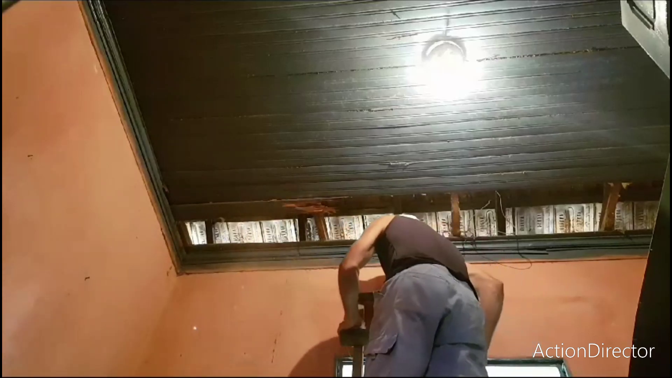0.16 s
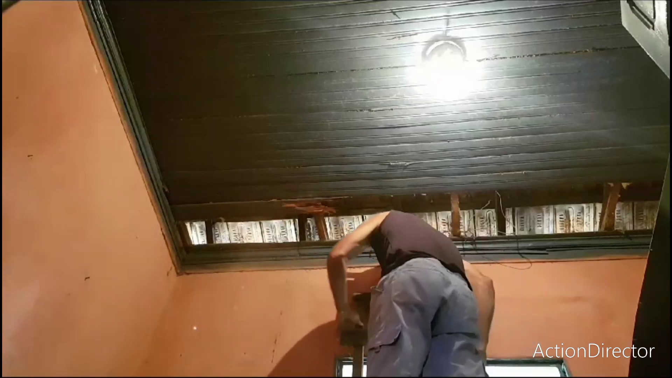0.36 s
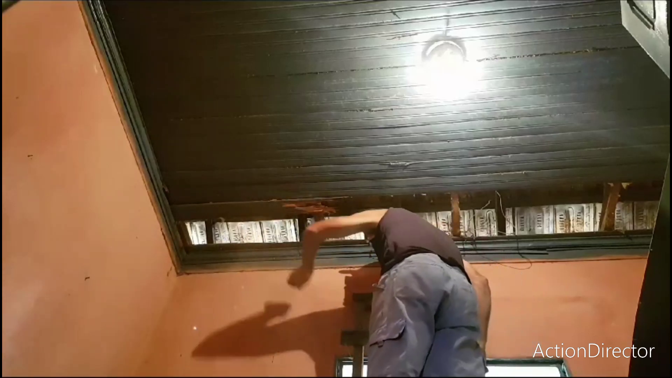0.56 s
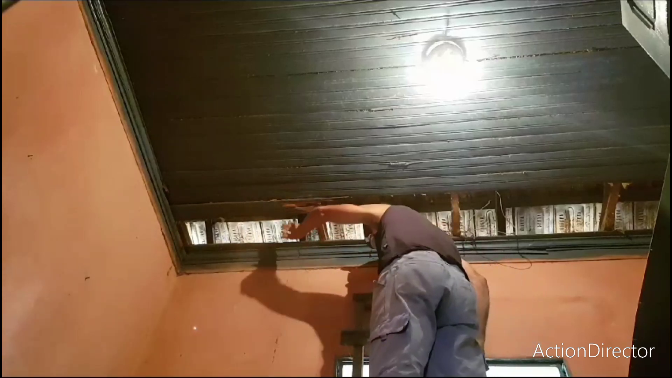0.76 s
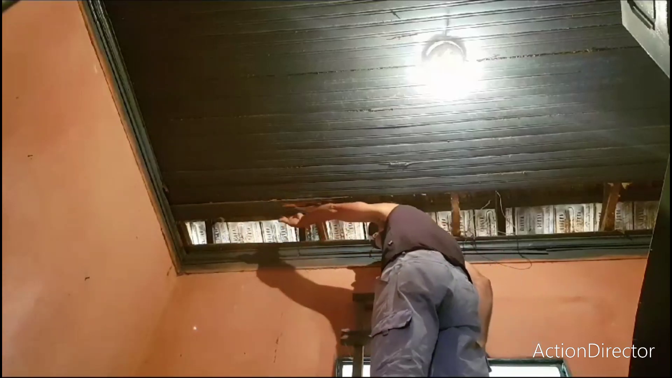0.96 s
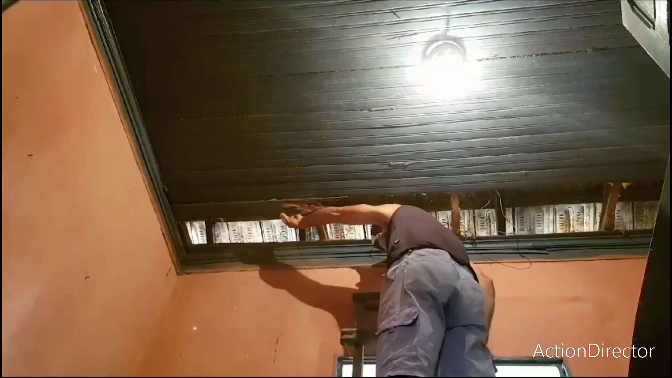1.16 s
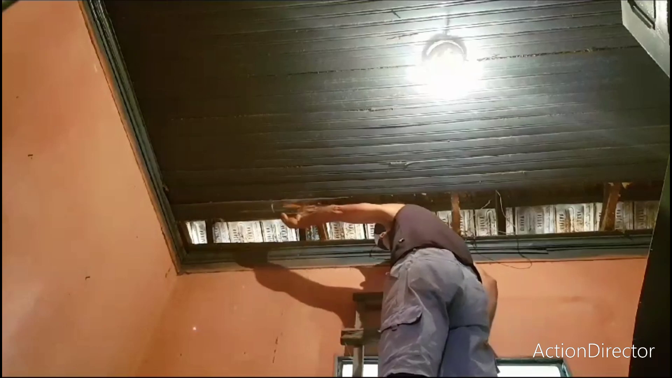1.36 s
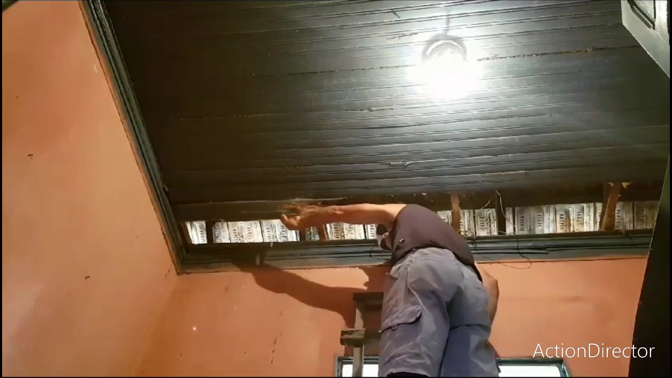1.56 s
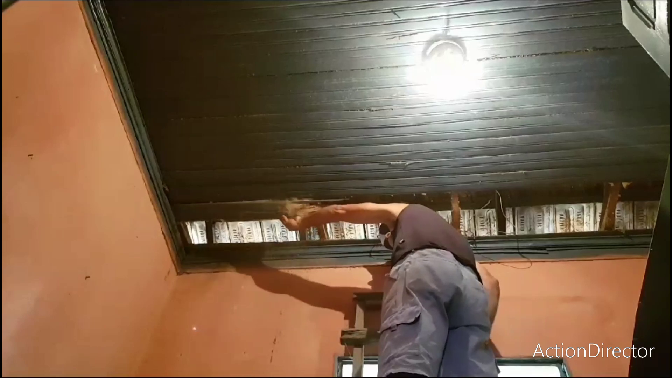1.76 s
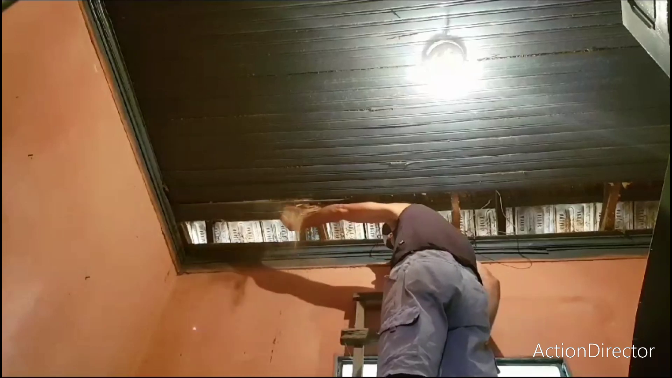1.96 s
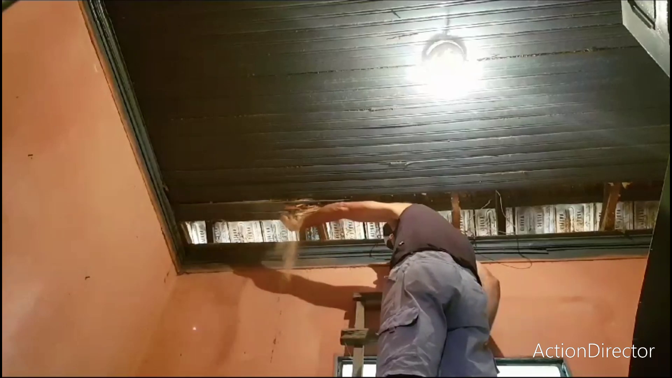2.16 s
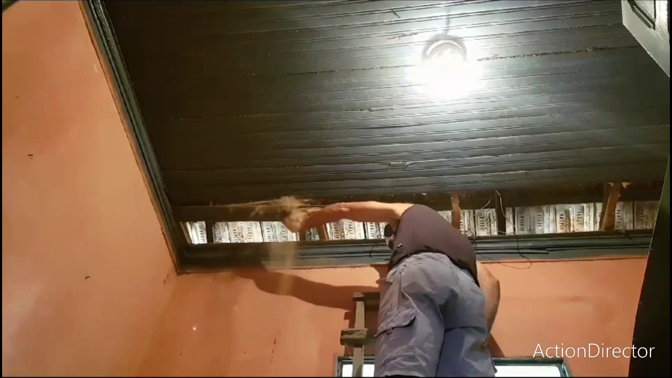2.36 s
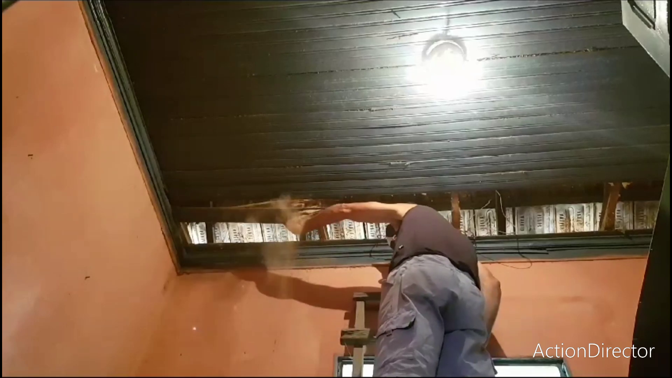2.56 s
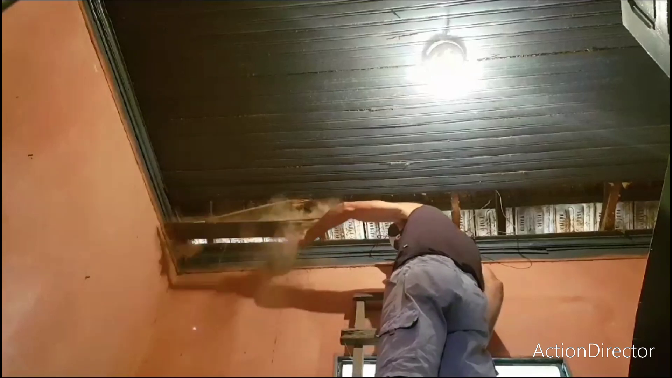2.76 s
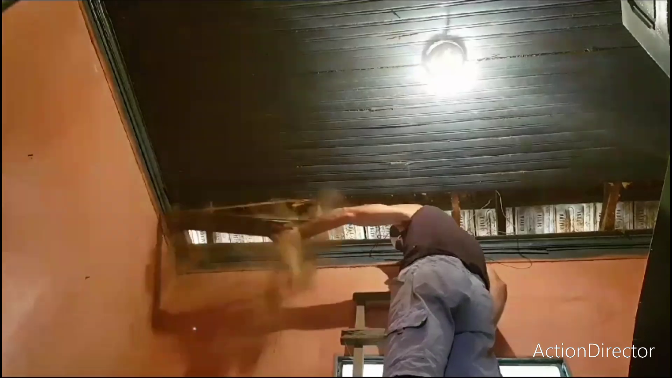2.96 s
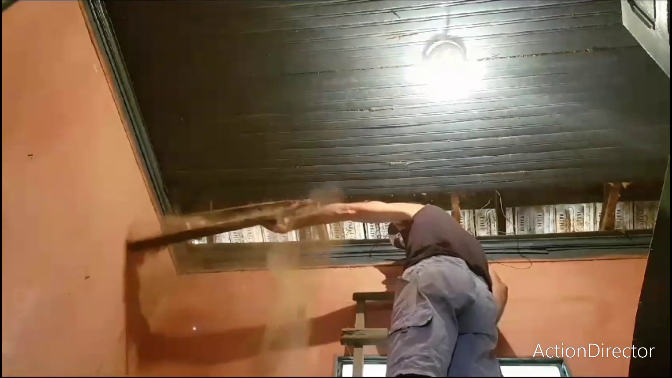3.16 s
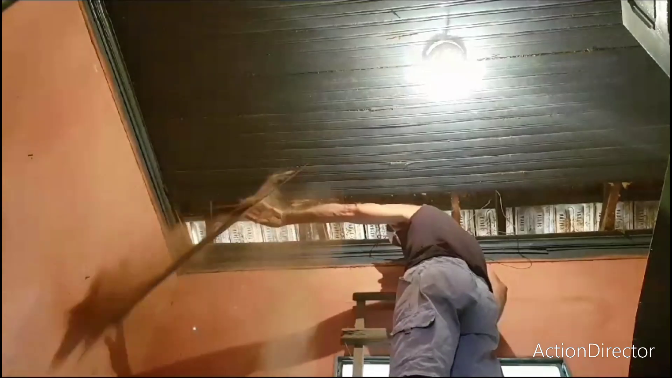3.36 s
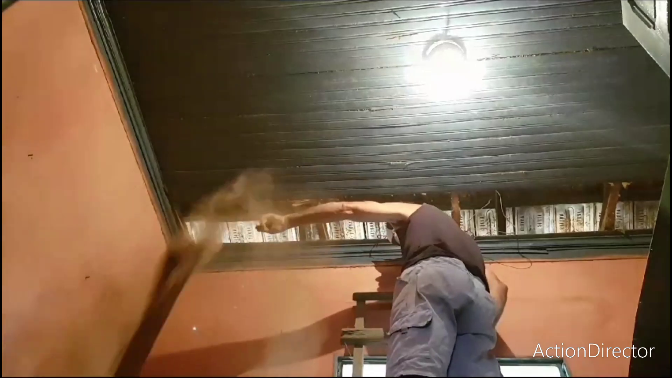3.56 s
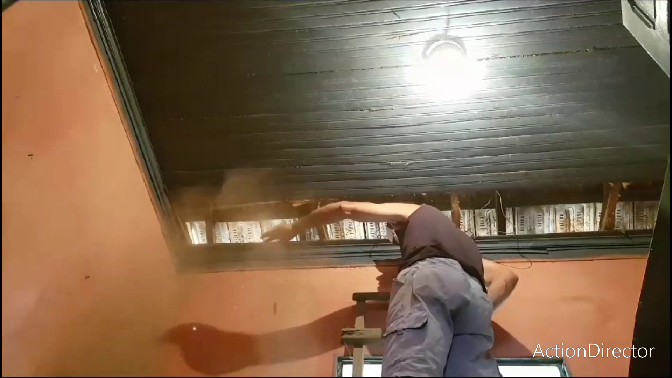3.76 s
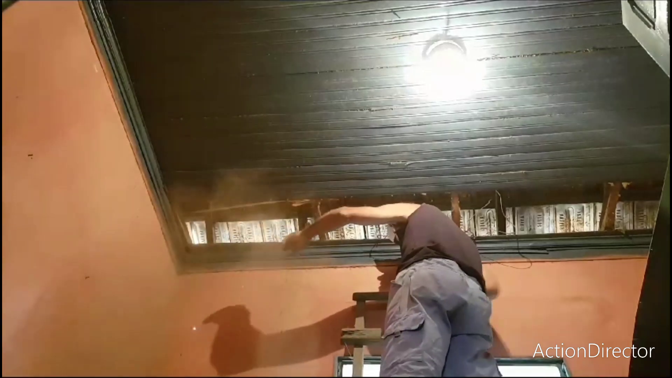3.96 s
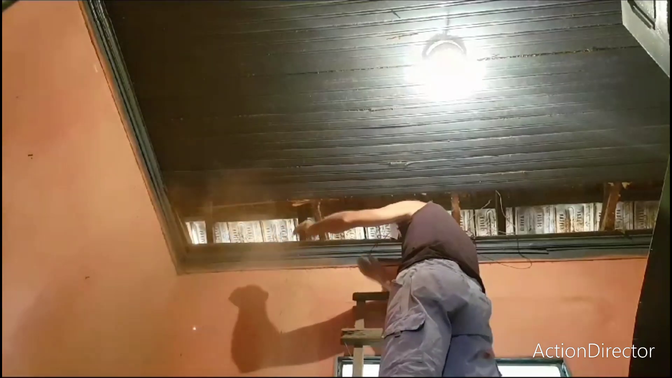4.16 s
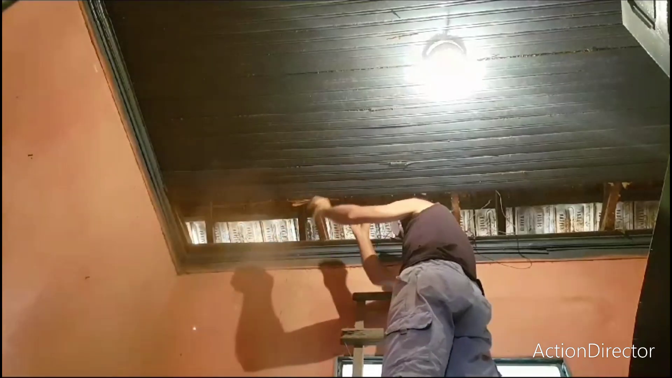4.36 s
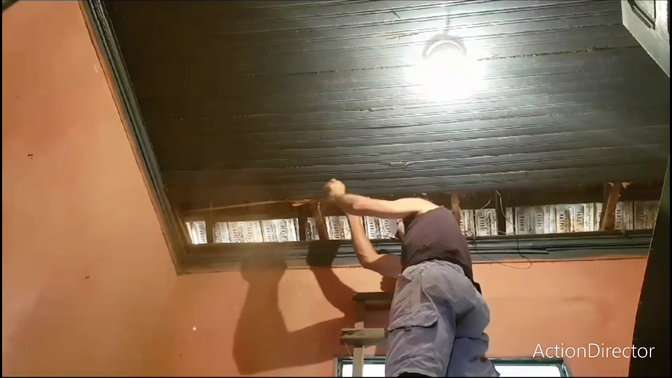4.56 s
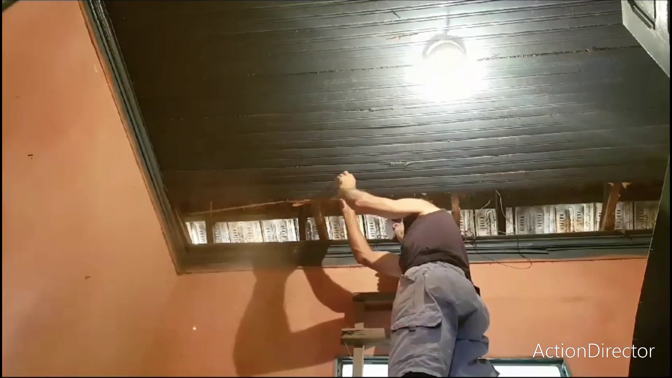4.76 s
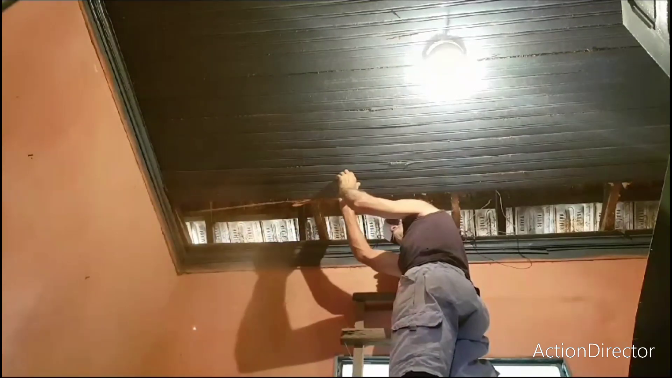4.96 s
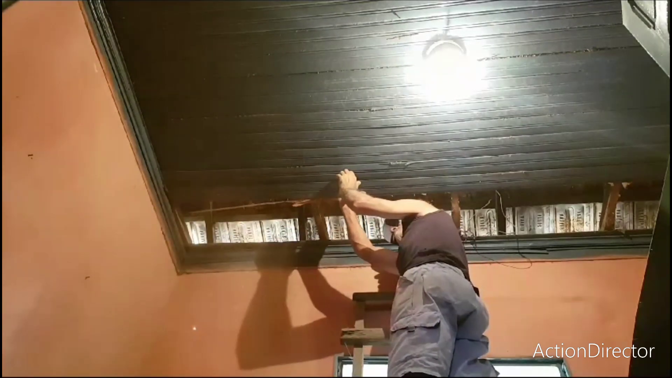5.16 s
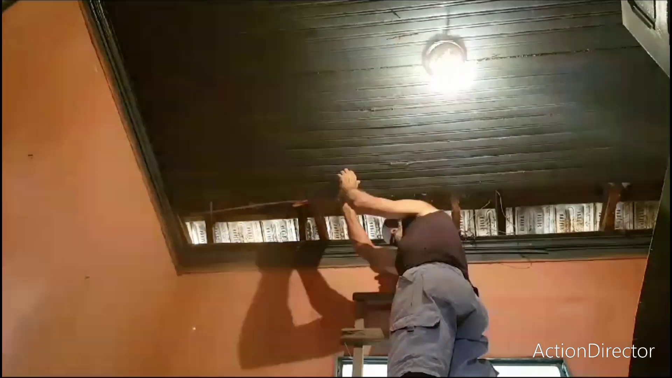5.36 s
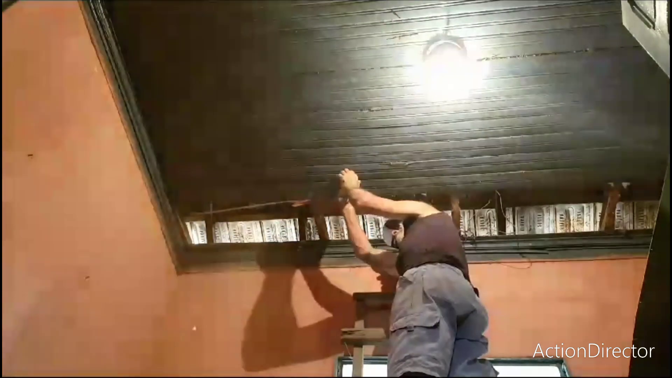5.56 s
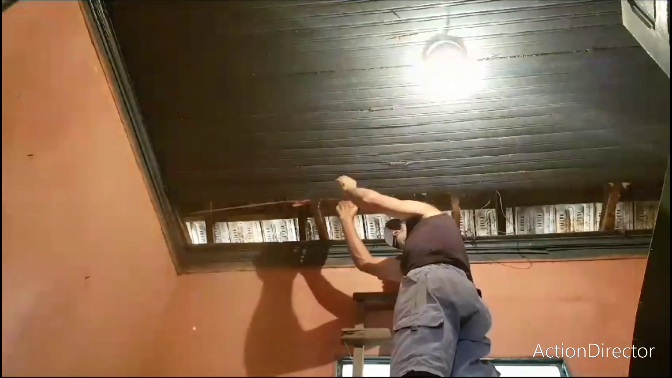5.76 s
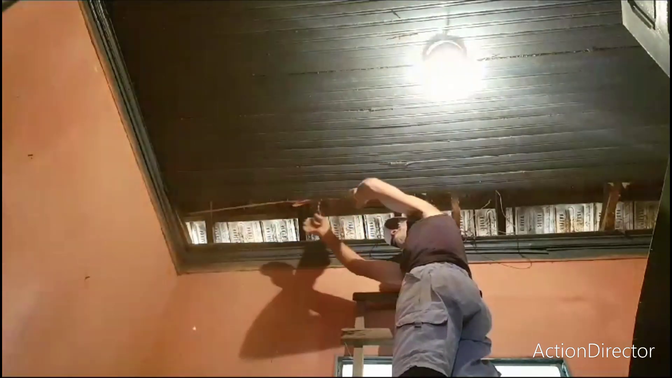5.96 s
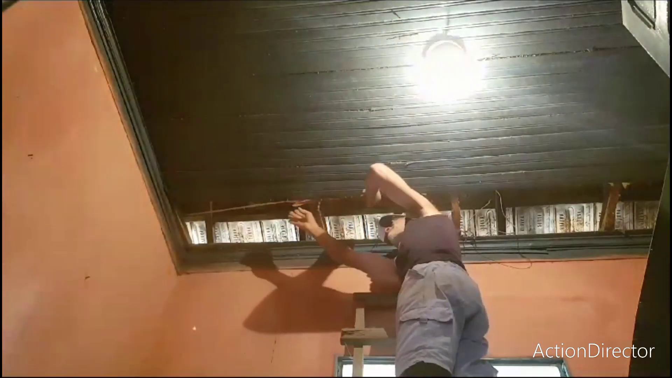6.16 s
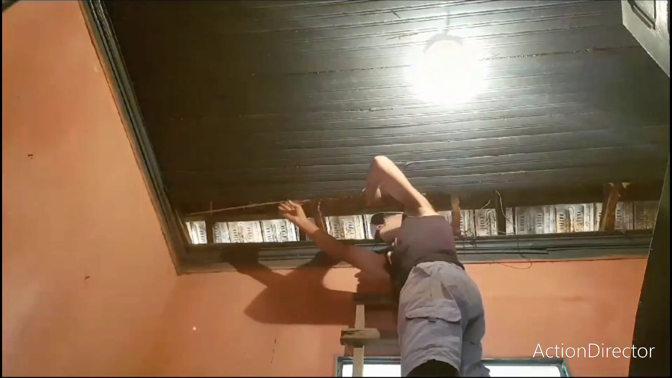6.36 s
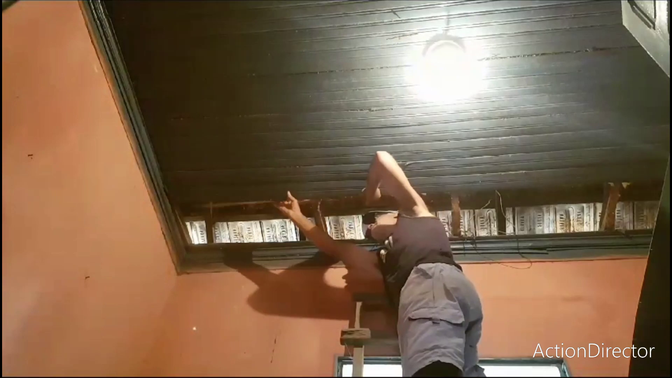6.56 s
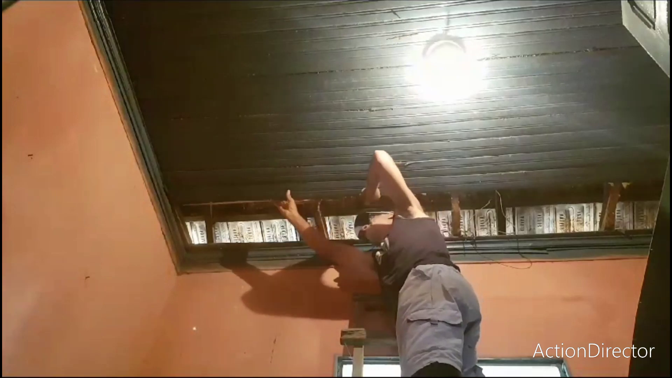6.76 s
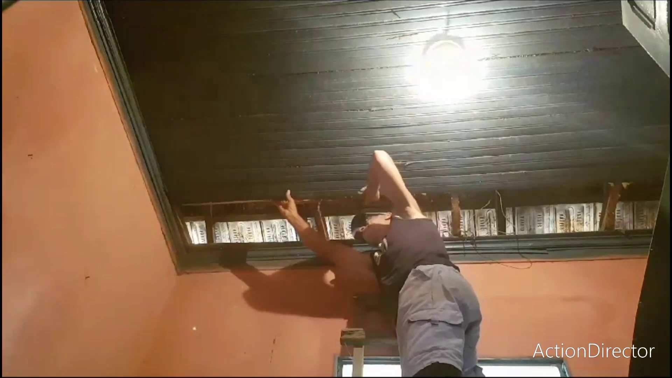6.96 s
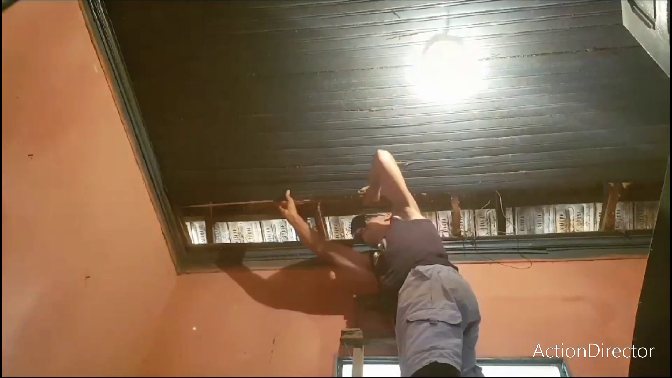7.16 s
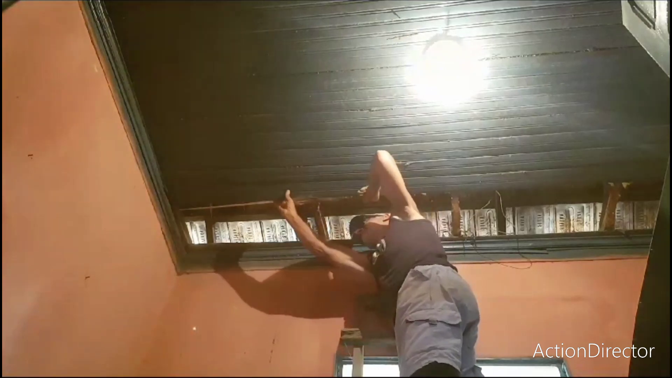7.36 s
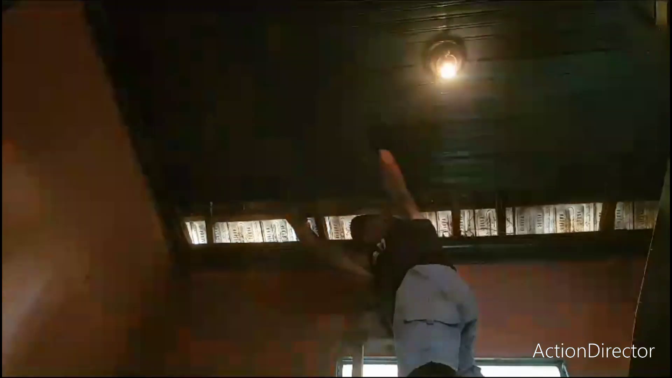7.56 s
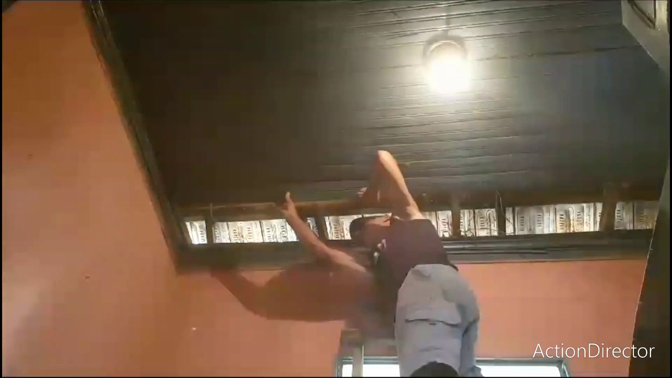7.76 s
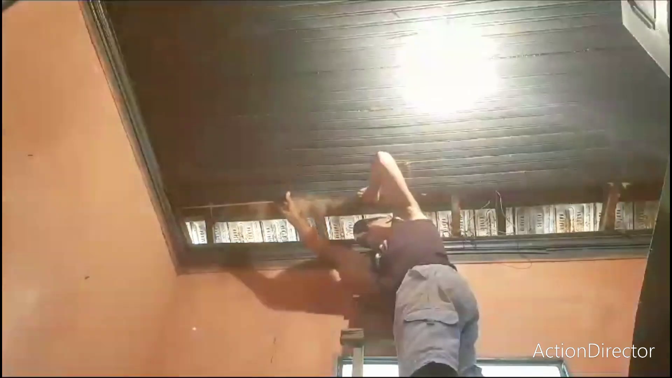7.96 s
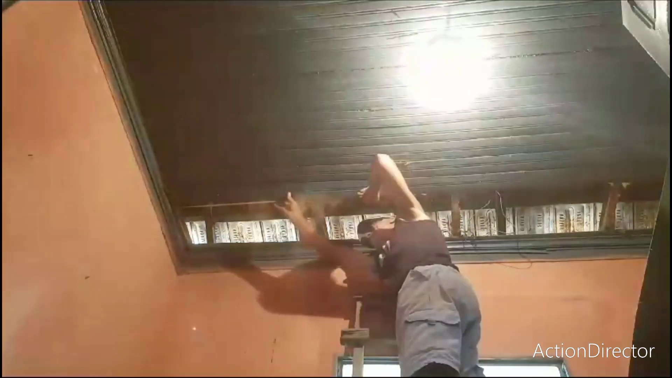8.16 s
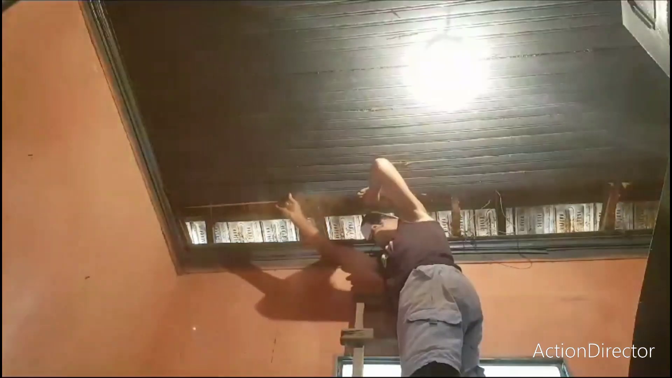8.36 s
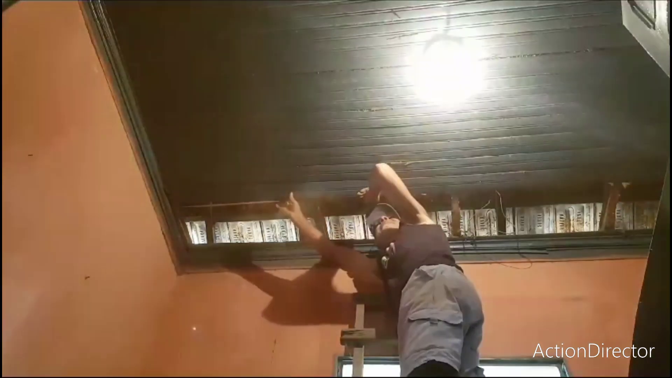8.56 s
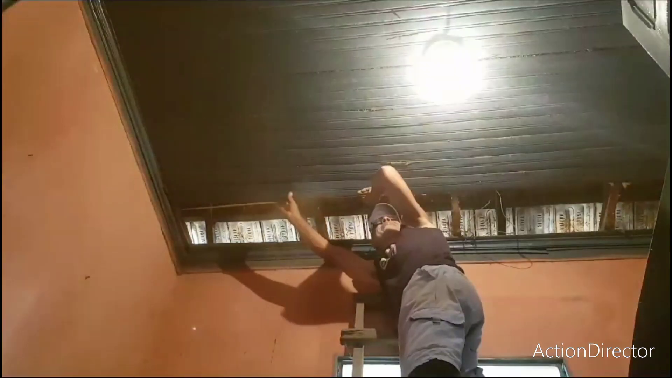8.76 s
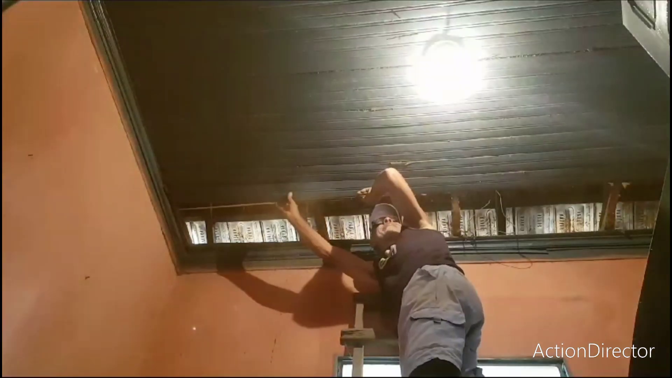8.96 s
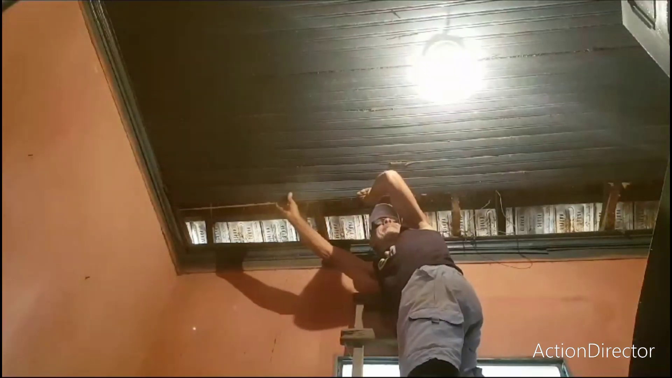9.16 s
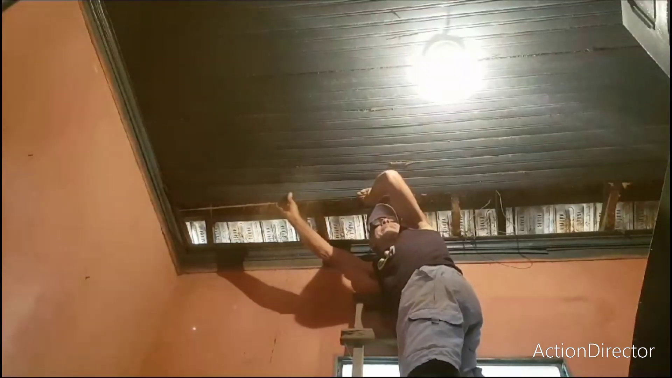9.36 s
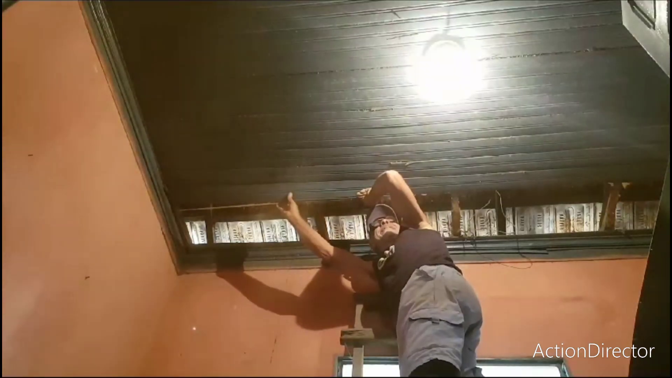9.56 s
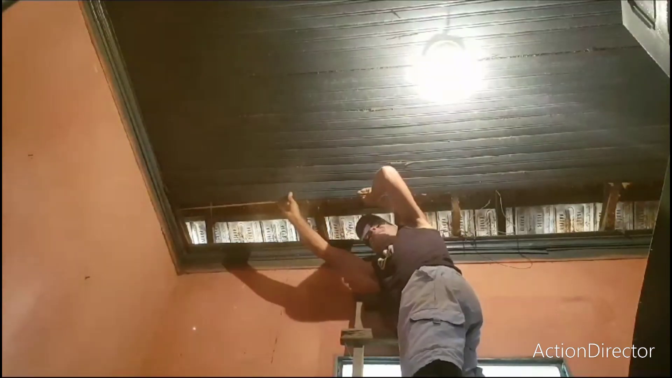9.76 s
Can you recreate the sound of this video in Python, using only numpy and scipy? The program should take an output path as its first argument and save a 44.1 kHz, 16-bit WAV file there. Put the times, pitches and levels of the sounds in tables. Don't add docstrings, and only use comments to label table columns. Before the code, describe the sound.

Dry old boards snap, knock and rattle in uneven bursts, with dust and crumbs pattering after each break in a small echoing room.

```python
import sys
import numpy as np
from scipy import signal
from scipy.fft import rfft, irfft, next_fast_len
from scipy.io import wavfile
from scipy.ndimage import map_coordinates

SR = 44100
rng = np.random.default_rng(int(sys.argv[2]) if len(sys.argv) > 2 else 0)


def transcribe(signal):
    frames = np.atleast_2d(signal).T
    limited = np.clip(frames, -1, 1)
    pcm = np.round(limited * 32767).astype(np.int16)
    wavfile.write(sys.argv[1], SR, pcm)


def gain_from_db(level_db):
    decades = np.asarray(level_db, float) / 20
    return 10 ** decades


N = 433062

# start_s, level_db
TOWN_SWELL = [
    (0, -46),
    (.6, -46),
    (1.3, -50),
    (2.0, -45),
    (3.1, -49),
    (4.4, -46),
    (6.5, -49.5),
    (8.0, -43),
    (9.82, -45.5),
]
# pitch_hz, level_db (per Hz)
RUMBLE_COLOUR = [(12, -44), (20, -8), (43, -6), (93, -6.5), (143, -11), (156, -7), (236, -14.5), (270, -16),
                 (398, -26), (577, -31.5), (700, -34.5), (910, -66), (1540, -120)]
# pitch_hz, level_db (per Hz)
HISS_COLOUR = [(240, -27.5), (400, -3), (600, -7), (964, -7), (2290, -13.5), (7170, -29.5), (12700, -29),
               (14800, -24.5), (16000, -33)]
# pitch_hz, level_db
LAMP_WHINE = [(12269, -87)]
HISS_DB, HISS_FOLLOWS = -65.5, .8

# pitch_hz, likeness (-1 to 1)
PORT_LIKENESS = [(60, .985), (130, .975), (290, .9), (500, .45), (800, .15), (1400, -.1), (3100, .05),
                 (15000, 0)]
# pitch_hz, level_db
PORT_BALANCE = [(100, -1), (250, -0.5), (500, 1.5), (1000, 0.4), (4000, 1.76), (12000, 1.2)]
# pitch_hz, t60_s
ROOM_DECAY = [(100, 0.27), (300, 0.46), (1000, 0.42), (3000, 0.4), (8000, 0.28), (15000, 0.14)]
BLOCK = SR // 8

# pitch_hz, level_db
CRUMB_COLOUR = [(150, -24), (500, -5), (1000, -7), (2000, 1.5), (3500, -1), (5500, -7), (8000, -38)]
# pitch_hz, level_db
DUST_COLOUR = [(2500, -30.5), (5000, 0.5), (8000, 1), (12000, 3.5), (15500, -1)]
# peak_s, level_db, swell_s (over 60 dB), fade_s (over 60 dB)
DUSTY_SHOWERS = [(.646, -63, .05, .4), (.976, -53, .15, .5), (1.54, -23.5, .18, .33), (1.72, -42, .9, .6),
                 (1.802, -27, .13, .36), (1.974, -32.5, .13, .32), (2.33, -39.5, .28, .3),
                 (2.512, -21, .15, .15), (2.544, -35, .05, .42), (2.93, -31, .25, .1), (3.26, -42, .05, .9),
                 (3.4, -26.5, .18, .5), (3.928, -45, .3, .8), (4.124, -18, .5, .45), (4.268, -18, .2, .45),
                 (4.59, -52, .5, 2.2), (5.35, -33, .02, .12), (5.4, -36, .02, .4), (5.64, -54, 1.5, .2),
                 (6.75, -63, 2.5, 1.2), (9.21, -29.5, .02, .26), (9.372, -39, .23, .46),
                 (9.47, -37, .03, .1), (9.76, -25, .04, .1)]
# peak_s, level_db, swell_s (over 60 dB), fade_s (over 60 dB)
COARSE_SHOWERS = [(.002, -37.5, .01, .22), (.22, -52, .03, .28), (.384, -54, .13, .32),
                  (2.76, -22, .05, .5), (2.82, -19, .3, .24), (2.99, -26, .1, .63), (3.63, -32, .1, .5),
                  (3.8, -43, .6, 1.5), (4.035, -22, .02, .6), (4.354, -21, .5, .4), (4.974, -43, .03, .3),
                  (7.63, -19.5, .05, .13), (7.69, -48, .1, .37), (8.0, -9, .02, .04),
                  (8.012, -28, .02, .34), (9.502, -24, .08, .22), (9.815, -18, .15, .1)]
DUSTY_DB, COARSE_DB, DUST_LINGERS = -4, -9, 1.1

# pitch_hz, width_hz, level_db
JOIST_MODES = [(58, 25, -9), (105, 35, -3), (143, 25, 4), (185, 35, 0), (252, 35, -4), (335, 80, -11)]
# pitch_hz, width_hz, level_db
LATH_MODES = [(450, 220, 2), (780, 320, 5.5)]
# multiple (of lowest ring), width (share of lowest ring), level_db
BOARD_OVERTONES = [(.92, .28, -3), (2.0001, 0.2, 4), (3.051, 0.17, 5), (4.02, .4, 0.7), (5.1, .5, -8.5),
                   (7.098, 0.64, -15)]
# pitch_hz, width_hz, level_db
END_MODES = [(700, 50, 1), (1410, 600, -6), (2150, 200, 1), (3570, 160, 1), (4300, 300, -7.5),
             (6000, 1700, -14.5)]
# pitch_hz, width_hz, level_db
FACE_MODES = [(255, 60, 3), (385, 130, 5), (750, 500, 0), (2300, 1800, -8)]

# start_s, level_db
RATTLE_BURSTS = [
    [(2.7114, -3.5), (2.7283, -4), (2.7494, -4.5), (2.7735, -7), (2.7937, -11), (2.8193, -11),
     (2.8375, -17)],
    [(2.9382, -2), (2.9546, -5), (2.9787, -5), (2.9987, -10), (3.0333, -17)],
]
RATTLE_PITCH = [1000, 1085]
# start_s, level_db, thump_db, splinter_db
WALL_HIT = [
    (3.6061, -16, -23, -19),
]
# start_s, level_db, thump_db, splinter_db
FLOOR_SLAM = [
    (4.019, -13, -9, -18),
    (4.0345, -15, -9, -24),
]
RATTLE_THUMP_DB, RATTLE_SPLINTER_DB, RING_SCATTER = -25, -15, .012

# start_s, level_db, splinter_db (extra spray), pitch_hz
FAINT_TICKS = [(.646, -43, -8, 1500), (.793, -52, 14, 2340), (.9408, -44, -5, 3500),
               (1.2302, -54, -5, 2240), (1.4377, -40, 8, 1960), (2.2363, -33.5, 2, 3950),
               (2.36, -36, 14, 2480), (3.9189, -33, -3, 2200), (4.9287, -46.5, 3, 2040),
               (4.9664, -35, -8, 2670), (5.9294, -47.5, -3, 2290), (6.7979, -52, 3, 2130),
               (7.3769, -36, -5, 1900), (8.555, -51, 0, 5000), (8.6388, -49.5, -2, 1840),
               (8.6592, -42, 4, 2330), (8.74, -58, 16, 4000), (8.8454, -57, 22, 2000),
               (9.0116, -38, 6, 2060)]
# start_s, level_db, weight_db, pitch_hz
FIBRE_SPLITS = [(1.4818, -29, -22, 3000), (1.511, -18, -32, 1920), (1.5288, -7, -34, 2960),
                (1.5364, -11, -27, 4300), (1.6845, -19, -21, 4050), (1.8039, -10, -19, 3880),
                (1.9578, -22, -15, 4050), (1.9742, -18.5, -10, 3320), (2.2806, -30, -13, 3980),
                (2.3083, -27.5, -18, 2250), (2.4441, -26, -20, 3080), (2.4815, -18, -19, 1930),
                (2.5044, -13, -9, 2060), (2.5295, -22.5, -4, 3230), (2.697, -23, -11, 980),
                (3.25, -22, -9, 2400), (3.4004, -23, -12, 1400), (3.5823, -29, -16, 2380),
                (4.0507, -13.5, -20, 2390), (4.1102, -9, -32, 3360), (4.3321, -8.5, -20, 1380),
                (5.3899, -15, -18, 1700), (7.9888, -10, -12, 1700), (9.2029, -19, -28, 2900),
                (9.3331, -31, -10, 1840), (9.3711, -28.5, -18, 2690), (9.469, -32, -18, 3500)]
# start_s, level_db, weight_db, pitch_hz
BOARD_KNOCKS = [(.2109, -36.5, -12, 1410), (.379, -41, -11, 1950), (1.4912, -23, -24, 2050),
                (1.719, -21.5, -28, 2800), (1.7816, -18, -20, 3230), (1.9464, -28, -27, 3880),
                (3.3616, -26, -14, 1600), (4.0195, -5, -22, 2600), (4.2484, -13, -20, 2160),
                (4.3092, -10, -11, 2400), (4.348, -12, -26, 1560), (5.3466, -30, -12, 3160),
                (6.8789, -31, -13, 1990), (7.6, -22, 5, 1500), (7.5881, -15, -2, 2860),
                (7.6308, -20, 2, 2050), (7.9769, -11, -1, 3160), (8.932, -51, -2, 1430),
                (9.1352, -38.5, -10, 1780), (9.749, -16, -31, 2830), (9.8174, -15, -25, 2970)]
# start_s, level_db, weight_db, pitch_hz
LATH_RAPS = [
    (.0014, -26, -26, 1250),
    (1.835, -21, -12, 3300),
    (4.1297, -22, -30, 3790),
    (5.404, -17, -11, 1000),
    (7.6166, -11.5, -7, 4120),
    (8.0187, -12, -10, 2000),
    (9.4795, -18, -26, 2500),
    (9.783, -10, -27, 2440),
]
SPRAY_DB = {"split": -8, "knock": -28, "tick": -10, "rap": -24}
LATH_KNOCK_DB = {"split": -5, "knock": -2.5, "tick": 0, "rap": 3}
TICK_WEIGHT_DB = -13
LATH_FOLLOWS = .6


def unit(x):
    return x / np.sqrt(np.mean(x ** 2) + 1e-20)


def peaked(x):
    return x / np.abs(x).max()


def along(points, hz):
    pitch_hz, value = np.transpose(points)
    return np.interp(np.log(hz + 1), np.log(pitch_hz + 1), value)


def wobble(rate):
    knots = rng.standard_normal(int(N * rate / SR) + 4)
    return map_coordinates(knots, [np.arange(N) * rate / SR])


def filtered(x, response):
    size = next_fast_len(x.shape[-1] + 8192)
    spectrum = rfft(x, size) * response(np.fft.rfftfreq(size, 1 / SR))
    return irfft(spectrum, size)[..., :x.shape[-1]]


def coloured(x, colour):
    return unit(filtered(x, lambda hz: gain_from_db(along(colour, hz))))


def resonances(modes):
    def response(f):
        total = 0
        for k, (pitch_hz, width_hz, level_db) in enumerate(modes):
            damping = 1j * f * width_hz
            mode = damping / (pitch_hz * pitch_hz - f * f + damping + 1e-9)
            total = total + (-1) ** k * gain_from_db(level_db) * mode
        return total
    return response


def ports(pair):
    def turn(hz):
        return np.arccos(np.clip(along(PORT_LIKENESS, hz), -1, 1)) / 2
    mid = filtered(pair[..., 0, :], lambda hz: np.cos(turn(hz)))
    side = filtered(pair[..., 1, :], lambda hz: np.sin(turn(hz)))
    return np.stack([mid + side, mid - side], axis=-2)


def background():
    t = np.arange(N) / SR
    rumble = coloured(ports(rng.standard_normal((2, N))), RUMBLE_COLOUR)
    hiss = coloured(rng.standard_normal((2, N)), HISS_COLOUR)
    town_db = np.interp(t, *np.transpose(TOWN_SWELL))
    hiss_db = HISS_DB + HISS_FOLLOWS * (town_db - town_db.mean())
    whine = 0
    for pitch_hz, level_db in LAMP_WHINE:
        cycles = pitch_hz * t + .3 * wobble(30)
        whine = whine + gain_from_db(level_db + 3) * np.sin(2 * np.pi * cycles)
    rumble = gain_from_db(town_db + 0.4 * wobble(6.2)) * rumble
    hiss = gain_from_db(hiss_db + 4 + .8 * wobble(3.9)) * hiss
    return rumble + hiss + whine


def room(x):
    blocks = np.pad(x, (0, -N % BLOCK)).reshape(-1, 1, BLOCK)
    noise = rng.standard_normal((len(blocks), 2, 4 * BLOCK))
    hz, t, z = signal.stft(noise, SR, nperseg=256)
    decay = gain_from_db(-60 * t / along(ROOM_DECAY, hz)[:, None])
    tails = signal.istft(z * decay, SR, nperseg=256)[1]
    t = np.arange(tails.shape[-1]) / SR
    near = 1 + 1.2 * gain_from_db(-60 * t / .022)
    tails = ports(tails * near)
    tails = tails / np.sqrt(np.mean(np.sum(tails ** 2, axis=2)))
    wet = signal.fftconvolve(blocks, tails, axes=2)
    out = np.zeros((2, N + SR))
    for k, piece in enumerate(wet):
        out[:, k * BLOCK:][:, :piece.shape[1]] += piece
    return out[:, :N]


def grains(per_second, spread_db):
    chance = per_second / SR * gain_from_db(4 * wobble(40))
    size = gain_from_db(spread_db * np.minimum(rng.exponential(size=N), 3))
    return (rng.random(N) < chance) * size * rng.choice([-1, 1], size=N)


def showers(rows, slower=1):
    t = np.arange(0, N, 64) / SR
    power = 0
    for peak_s, level_db, swell_s, fade_s in rows:
        before = (peak_s - t) / swell_s
        after = (t - peak_s) / (fade_s * slower)
        power = power + gain_from_db(level_db - 60 * np.where(t < peak_s, before, after)) ** 2
    return np.interp(np.arange(N) / SR, t, power)


def crumble():
    crumbs = coloured(grains(700, spread_db=3), CRUMB_COLOUR)
    dust = coloured(grains(1800, spread_db=3), DUST_COLOUR)
    crumb_power = showers(DUSTY_SHOWERS + COARSE_SHOWERS)
    dust_power = gain_from_db(2 * DUSTY_DB) * showers(DUSTY_SHOWERS, DUST_LINGERS)
    dust_power += gain_from_db(2 * COARSE_DB) * showers(COARSE_SHOWERS, DUST_LINGERS)
    return gain_from_db(-18.5) * (np.sqrt(crumb_power) * crumbs + gain_from_db(3.0) * np.sqrt(dust_power) * dust)


def tear(length_s):
    t = np.arange(SR // 5) / SR
    fibres = rng.standard_normal(len(t)) * gain_from_db(-60 * t / length_s)
    return (t == 0) + .07 * fibres


def struck(force, modes):
    return peaked(filtered(force, resonances(modes)))


def cracked(force, hz):
    hump = resonances([(hz, 1.3 * hz, 0)])

    def response(f):
        ratio = f / (1.7 * hz)
        return hump(f) / (1 - ratio ** 2 + 1.2j * ratio)
    return peaked(filtered(force, response))


def add(out, start_s, hit):
    out[round(start_s * SR):][:len(hit)] += hit


def board_hit(out, row, modes):
    start_s, level_db, thump_db, splinter_db = row
    force = tear(length_s=.006)
    thump = gain_from_db(thump_db - 1.5) * struck(force, JOIST_MODES)
    splinter = gain_from_db(splinter_db + 6.5) * struck(force, [(8700, 6900, 0)])
    add(out, start_s, gain_from_db(level_db - 4.5) * (struck(force, modes) + thump + splinter))


def rattle(out):
    for burst, burst_hz in zip(RATTLE_BURSTS, RATTLE_PITCH):
        for start_s, level_db in burst:
            hz = burst_hz * (1 + RING_SCATTER * rng.standard_normal())
            ring = [(hz * multiple, hz * width, db) for multiple, width, db in BOARD_OVERTONES]
            board_hit(out, (start_s, level_db, RATTLE_THUMP_DB, RATTLE_SPLINTER_DB), ring)


def loose_boards():
    out = np.zeros(N + SR)
    rattle(out)
    for row in WALL_HIT:
        board_hit(out, row, END_MODES)
    for row in FLOOR_SLAM:
        board_hit(out, row, FACE_MODES)
    return out[:N]


def snap(out, kind, start_s, level_db, weight_db, pitch_hz, spray_db=0):
    force = tear(length_s=.016)
    crack = cracked(force, pitch_hz)
    thump = gain_from_db(weight_db - 4) * struck(force, JOIST_MODES)
    knock = gain_from_db(LATH_KNOCK_DB[kind] + LATH_FOLLOWS * weight_db) * struck(force, LATH_MODES)
    splinter = gain_from_db(SPRAY_DB[kind] + spray_db + 9) * struck(force, [(9500, 22000, 0)])
    add(out, start_s, gain_from_db(level_db - 3.8) * (crack + thump + knock - splinter))


def snaps():
    out = np.zeros(N + SR)
    for kind, rows in [("split", FIBRE_SPLITS), ("knock", BOARD_KNOCKS), ("rap", LATH_RAPS)]:
        for row in rows:
            snap(out, kind, *row)
    for start_s, level_db, spray_db, pitch_hz in FAINT_TICKS:
        snap(out, "tick", start_s, level_db, TICK_WEIGHT_DB, pitch_hz, spray_db)
    return out[:N]


def scene():
    wood = snaps() + loose_boards() + crumble()
    direct = np.array([wood, np.roll(wood, shift=4)])
    return gain_from_db(-4.3) * direct + gain_from_db(12.5) * room(wood) + background()


def roll_off(x):
    return signal.sosfilt(signal.butter(12, 16500, fs=SR, output="sos"), x)


def record(dry):
    def port_response(hz):
        fade_db = -34 * np.clip((hz - 15150) / 450, 0, 1)
        return gain_from_db(fade_db + np.outer([.5, -.5], along(PORT_BALANCE, hz)))
    heard = filtered(dry, port_response)
    heard = heard / (1 + np.abs(heard / .98) ** 6) ** (1 / 6)
    return roll_off(heard)


dry = scene()
out = record(dry)
transcribe(out)
```